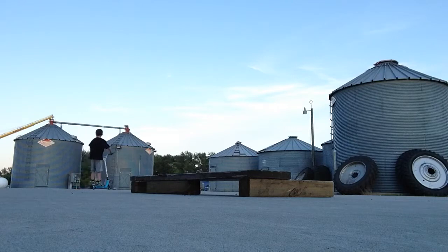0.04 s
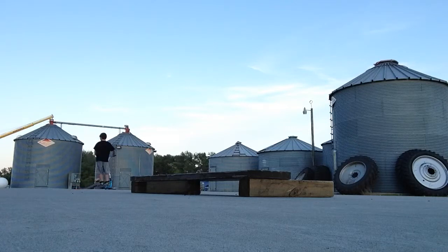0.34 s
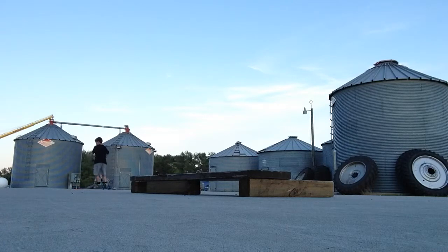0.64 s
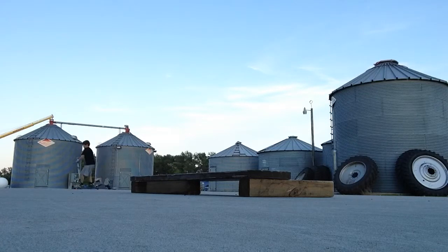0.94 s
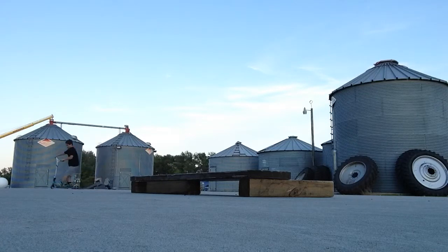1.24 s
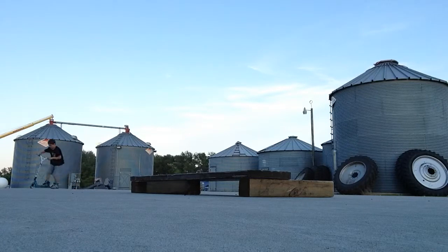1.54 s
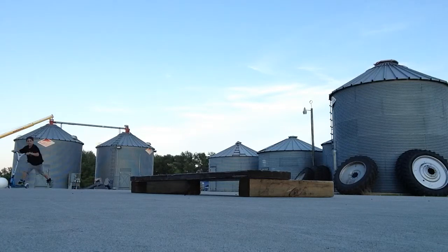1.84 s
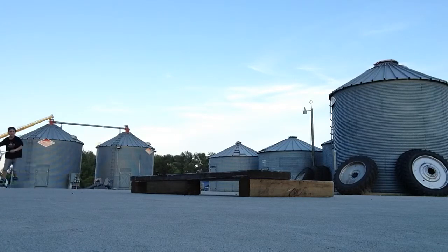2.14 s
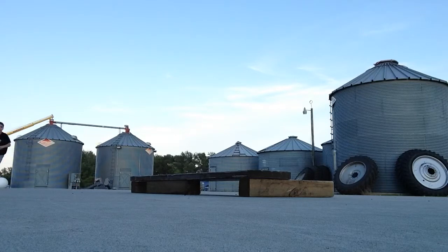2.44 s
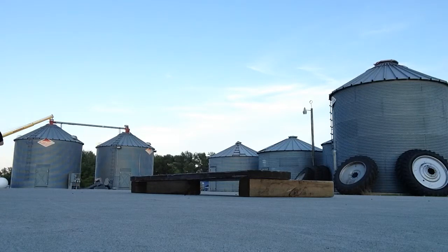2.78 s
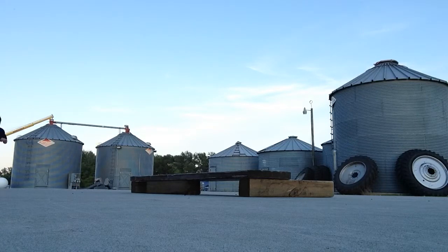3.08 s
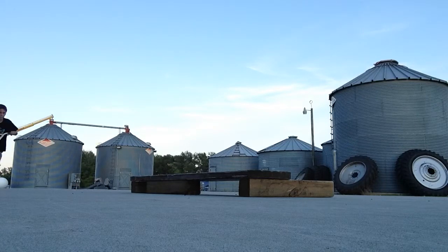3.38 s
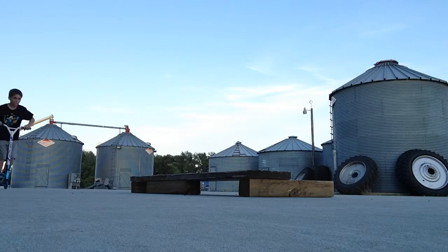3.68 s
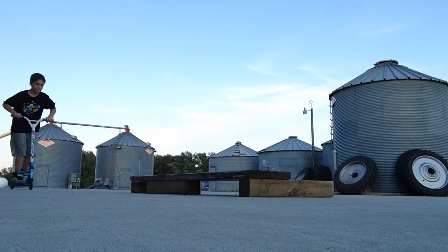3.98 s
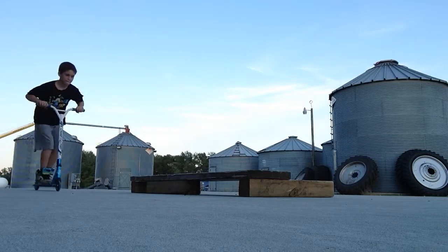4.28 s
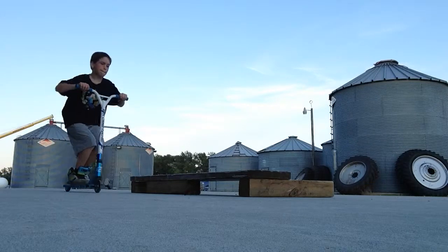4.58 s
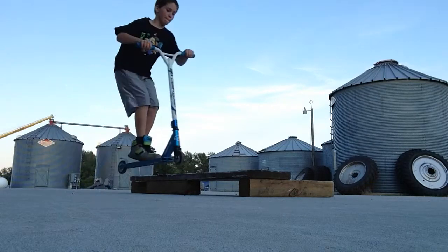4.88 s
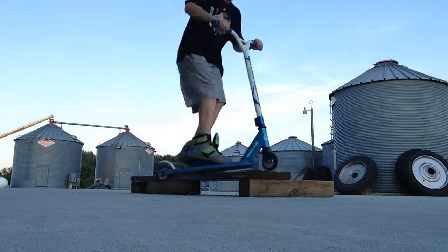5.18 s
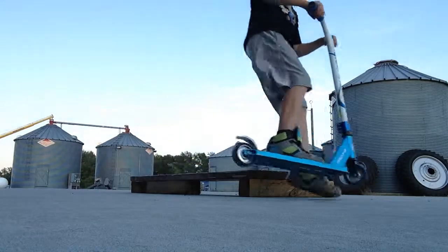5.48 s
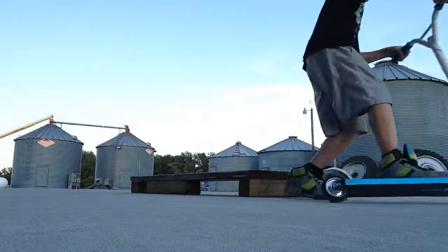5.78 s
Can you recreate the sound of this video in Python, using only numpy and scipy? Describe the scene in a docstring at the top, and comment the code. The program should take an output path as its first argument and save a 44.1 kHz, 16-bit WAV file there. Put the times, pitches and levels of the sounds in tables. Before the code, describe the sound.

For the first four seconds a kick scooter circles some way off on concrete, its hard wheels humming faintly on grit. Light frame clacks and soft shoe scuffs come around 1, 1.7, 2.4 and 3.2 seconds. A small bird gives faint runs of falling chirps near 0.5, 2 and 3.6 seconds over quiet open air. At about 4.5 seconds a gust buffets the ground-level microphone with low thumps as the scooter approaches. At 5.1 seconds it lands loudly and very close on a wooden pallet, with hollow thuds and a metallic crack, then rumbles briefly along the boards. After another wind bump, it drops onto the concrete at about 5.6 seconds with a loud clatter of frame and ringing steel brake, and a gritty scrape. A shoe scuff and lighter clacks follow near 6 seconds. A faint, dull echo comes off nearby steel bins.

```python
"""Kick scooter on a farmyard

The microphone lies on a concrete slab, bumped by wind; a small bird calls. A scooter circles some way
off, hard wheels humming on grit, frame clacking, steel brake ringing, a shoe scuffing the ground. It
rolls up close, thuds onto the boards of a wooden pallet and drops off. Steel grain bins echo faintly."""
import sys
import numpy as np
from scipy import signal
from scipy.fft import rfft, irfft, next_fast_len
from scipy.io import wavfile
from scipy.ndimage import uniform_filter1d

SR = 44100
rng = np.random.default_rng(int(sys.argv[2]) if len(sys.argv) > 2 else 0)


def log_audio(samples):
    """Write samples as a 16-bit WAV file to the path given in sys.argv[1]."""
    # one column per channel
    frames = np.atleast_2d(samples).T
    # limit to full scale, then quantise
    limited = np.clip(frames, -1, 1)
    pcm = np.round(limited * 32767).astype(np.int16)
    wavfile.write(sys.argv[1], SR, pcm)


N = 265746
T = np.arange(N) / SR

# dull spectrum of the frame's rattle and of rubbing: freq_hz, gain_db
FRAME_SPECTRUM = [(60, -22.5), (200, -9.5), (550, -1.5), (800, -2), (1150, -0.5), (1900, -2.5), (2700, -13),
                  (4000, -18), (16000, -66.5)]
# resonances that colour both: centre_hz, width_hz, lift_db
FRAME_RESONANCES = [(535, 34, 7), (720, 24, 9.5), (1180, 90, 0.5), (1508, 29, 6)]


def undb(db):
    return 10 ** (np.asarray(db) / 20)


def unit(x):
    return x / np.sqrt(np.mean(x ** 2))


def fade(t, t60):
    return np.exp(-np.log(1000) * t / t60)


def swell(start_s, length_s, attack_s, t60):
    """Rise, hold until the length is over, then die away."""
    return np.clip((T - start_s) / attack_s, 0, 1) * fade(np.maximum(T - start_s - length_s, 0), t60)


def curves(table):
    """Each column after the first, joined by straight lines in time."""
    times, *columns = np.transpose(table)
    return [np.interp(T, times, column) for column in columns]


def add(out, start_s, x):
    """Mix x in from the start time."""
    i = max(int(start_s * SR), 0)
    out[i:i + len(x)] += x[:max(N - i, 0)]


def colour(x, spectrum, resonances=()):
    """Causal filter of unit power from a spectrum and resonances that stand out of it."""
    size = next_fast_len(N + 8192)
    freq_hz = np.arange(size // 2 + 1) * SR / size + 1
    hz, db = np.transpose(spectrum)
    gain_db = np.interp(np.log(freq_hz), np.log(hz), db)
    for centre_hz, width_hz, lift_db in resonances:
        gain_db += lift_db / (1 + ((freq_hz - centre_hz) / width_hz) ** 2)
    cepstrum = irfft(np.log(unit(undb(gain_db))), size)
    cepstrum[1:size // 2] *= 2  # minimum phase: nothing rings before a blow
    cepstrum[size // 2 + 1:] = 0
    return irfft(rfft(x, size) * np.exp(rfft(cepstrum)), size)[:N]


def walk(rate_hz):
    """Smooth random wander, rms 1."""
    hold = int(SR / rate_hz)
    steps = np.repeat(rng.standard_normal(N // hold + 1), hold)
    return unit(uniform_filter1d(steps, hold)[:N])


def grains(per_s, spread_db):
    """Dense tiny clicks of very unequal size."""
    size = undb(spread_db * np.minimum(rng.exponential(size=N), 4))
    return unit((rng.random(N) < per_s / SR) * size * rng.choice([-1, 1], N))


def ring(modes, detune, favoured_hz=1000, focus_db=0):
    """Struck modes ring down; the contact point favours those near one pitch."""
    t = T[:SR // 2]
    hz, db, t60 = np.transpose(modes)[:, :, None]
    pitch_hz = hz * (1 + detune * rng.standard_normal(hz.shape))
    side = (-1.) ** np.arange(len(modes))[:, None]  # neighbouring modes swing opposite ways
    size = undb(db + focus_db / (1 + (np.log2(hz / favoured_hz) / .24) ** 2))
    size = side * size / np.sqrt(np.sum(size ** 2) / 2)
    return np.sum(size * fade(t, t60) * np.sin(2 * np.pi * pitch_hz * t), axis=0)


def chatter(t60, snap, rattle_db):
    """One sharp contact, then loose parts buzzing unevenly to rest."""
    t = T[:SR // 3]
    contacts = undb(rattle_db * unit(uniform_filter1d(rng.standard_normal(len(t)), size=45)))
    buzz = unit(contacts * rng.standard_normal(len(t))) * fade(t, t60)
    buzz[0] += snap * 2
    return buzz


def yard(level_db=-69.5):
    """Quiet open air that swells a little."""
    air_spectrum = [(18, -24.5), (40, -10), (85, -3.5), (140, 11.5), (200, 0), (260, 2.5), (360, -4.5),
                    (700, -6.5), (900, -13.5), (1400, -16.5), (2300, -26.5), (3800, -23), (7500, -24.5),
                    (15000, -32.5)]  # freq_hz, gain_db
    return colour(rng.standard_normal(N), air_spectrum) * undb(level_db + walk(1.9))


def wind(breeze_db=-69.5, strong_db=-24, breakup=.45, flutter_db=5):
    """Gusts rise out of a breeze and push on the microphone; strong ones break into faster eddies."""
    gusts = [(0, 0.13, -51.5), (0.247, 0.15, -53.5), (.47, 0.11, -54), (2.99, 0.23, -64.5),
             (3.559, 0.12, -60), (4.126, 0.15, -52.5), (4.455, 0.035, -46.5), (4.517, 0.18, -24),
             (4.713, 0.038, -28.5), (5.429, 0.07, -32.5), (5.534, .14, -32)]  # start_s, length_s, level_db
    buffet_spectrum = [(18, -30), (45, -0.5), (85, 4), (160, 2.5), (260, -10), (400, -29), (800, -47),
                       (2000, -76.5), (10000, -115)]  # slow air: freq_hz, gain_db
    eddy_spectrum = [(60, -19), (200, 3.5), (400, -1.5), (600, -8), (900, -26), (1500, -51), (3000, -68),
                     (10000, -105)]  # fine eddies: freq_hz, gain_db
    breeze = undb(breeze_db + 6 * np.tanh(walk(7)))
    gusting = sum(undb(db) * swell(s, length, attack_s=.0093, t60=.14) for s, length, db in gusts)
    gust_db = 20 * np.log10(breeze + gusting)
    air = colour(rng.standard_normal(N), buffet_spectrum)
    air /= np.sqrt(uniform_filter1d(air ** 2, size=1300) + 1e-3)  # the gust alone sets the strength
    eddy_db = gust_db - 4 + breakup * (gust_db - strong_db) + flutter_db * np.tanh(walk(110))
    eddies = colour(rng.standard_normal(N), eddy_spectrum) * undb(eddy_db)
    return air * undb(gust_db) + eddies + wind_thumps(gust_db, breeze_db, strong_db)


def wind_thumps(gust_db, breeze_db, strong_db, per_s=24, above_db=7, scatter_db=8, scatter_octaves=.77):
    """Single eddies hit the microphone for a cycle or two, louder and higher in a stronger gust."""
    hardest = [(4.183, -25, 111), (4.239, -28, 192), (4.533, -8, 238), (4.581, -14, 154),
               (4.622, -13.5, 440), (4.653, -11, 274), (4.69, -11, 129), (4.696, -13, 560),
               (5.447, -18.5, 195), (5.485, -24.5, 290), (5.507, -17.5, 220), (5.581, -16.5, 281)]  # peak_s, peak_db, pitch_hz
    out, eddies = np.zeros(N), list(hardest)
    chance = rng.uniform(-1, 1, (512, 3))
    phases = rng.uniform(0, 2 * np.pi, 512)
    for slot_s, (late, force, shift) in zip(np.arange(0, T[-1], 1 / per_s), chance):
        s = slot_s + late / per_s / 2
        db = np.interp(s, T, gust_db)
        hz = np.interp(db, [breeze_db, strong_db], [125, 284])
        eddies.append((s, db + above_db + scatter_db * force, hz * 2 ** (scatter_octaves * shift)))
    for (s, db, hz), phase in zip(eddies, phases):
        span = slice(*np.searchsorted(T, [s - .04, s + .04]))
        turn = 2 * np.pi * hz * (T[span] - s)
        out[span] += undb(db) * np.cos(turn + phase) / np.cosh(turn / 2.2)
    return out


def wheels():
    """Rough ground shakes wheels and deck, harder on the boards; the wheels sing and grit crackles."""
    slab_roll = [(0, -66, -74), (.8, -62.5, -74.5), (1.15, -62.5, -64.5), (1.55, -66.5, -70),
                 (2.1, -63.5, -70), (2.8, -65, -72), (3.3, -62, -71.5), (4.4, -62, -72), (4.72, -51, -65),
                 (4.9, -61, -71), (5.9, -70.5, -72), (6.03, -57, -58.5)]  # follows speed and distance: time_s, hum_db, grit_db
    board_runs = [(5.154, 0.098, -44.5, -54.5), (5.247, 0.039, -39.5, -42), (5.301, 0.02, -36.5, -43)]  # along the pallet: start_s, length_s, hum_db, grit_db
    hum_spectrum = [(60, -35.5), (160, -3), (400, -2), (590, -3.5), (800, 0.5), (1500, -9.5), (2500, -23),
                    (5000, -28), (16000, -64.5)]  # freq_hz, gain_db
    grit_spectrum = [(400, -24), (1500, 6.5), (3300, -0.5), (5000, -4.5), (7500, -10.5), (10000, -16),
                     (16000, -20)]  # freq_hz, gain_db
    rolling_resonances = [(276, 72, 6), (495.5, 89, 11), (696, 31, 6.5), (1124, 11, 12), (1390, 78, 11),
                          (1970, 62, 3)]  # centre_hz, width_hz, lift_db
    singing_pitch = [(2.1, 520), (2.45, 498), (4.15, 491), (4.42, 474), (6.03, 472)]  # sinks as the scooter slows: time_s, pitch_hz
    singing_spells = [(1.856, .35, -63.5), (3.419, 0.74, -66.5), (4.342, 0.3, -57.5), (5.24, .13, -44)]  # start_s, length_s, level_db
    shake, grit = undb(curves(slab_roll))
    for s, length, hum_db, grit_db in board_runs:
        run = swell(s, length, attack_s=.005, t60=.09)
        shake += undb(hum_db) * run
        grit += undb(grit_db) * run
    bumps = walk(45)
    hum = colour(grains(2200, 2.8) * shake * undb(2.6 * bumps - 2), hum_spectrum, rolling_resonances)
    note_hz = curves(singing_pitch)[0] * (1 + .0176 * walk(60))
    singing = sum(undb(db) * swell(s, length, attack_s=.042, t60=.33) for s, length, db in singing_spells)
    note = np.sin(2 * np.pi * np.cumsum(note_hz) / SR) * singing * undb(2.1 * walk(28))
    crackle = colour(grains(5000, 3) * grit * undb(2.4 * bumps), grit_spectrum)
    return hum + note + crackle


def bird(note_s=.054, spacing_s=.128, rise_db=1, drop_hz=148.5, rasp=.043, scatter_db=5):
    """Short, slightly raspy notes slide down, each with its own bend and strength."""
    phrases = [(0.466, .44, -70), (2.056, .57, -68.5), (3.594, .44, -68), (5.414, .19, -70)]  # runs of evenly spaced notes: start_s, length_s, first_note_db
    high_whistles = [(5.55, 6810, 5200, -64.5), (5.808, 8170, 4630, -69.5)]  # start_s, start_hz, end_hz, level_db
    notes = list(high_whistles)
    for first_s, length, db in phrases:
        for k, s in enumerate(np.arange(first_s, first_s + length, spacing_s)):
            notes.append((s, 4350, 3150 - k * drop_hz, db + k * rise_db))
    out = np.zeros(N)
    progress = np.linspace(0, 1, int(note_s * SR))
    envelope = np.sin(np.pi * progress ** .58)
    wobble = 1 + rasp * walk(900)
    chance = rng.uniform([.8, -1], [1.1, 1], (len(notes), 2))
    for (s, start_hz, end_hz, db), (bend, force) in zip(notes, chance):
        glide_hz = start_hz * (end_hz / start_hz) ** (progress ** bend)
        pitch_hz = glide_hz * np.roll(wobble, -int(s * SR))[:len(progress)]
        note = undb(db + scatter_db * force) * envelope * np.sin(2 * np.pi * np.cumsum(pitch_hz) / SR)
        add(out, s, note)
        add(out, s + .052, undb(-9.5) * note)  # the nearest bin throws the note back
    return out


def scuffs():
    """Soles and skidding wheels drag over sandy concrete: a quick bite and a slower release."""
    drags = [(0.836, 0.11, -84, -64.5), (1.568, 0.039, -62.5, -70), (1.685, 0.055, -56, -57.5),
             (1.761, 0.078, -57.5, -63.5), (1.869, 0.097, -63, -67.5), (2.343, 0.024, -54.5, -60),
             (3.102, 0.069, -54, -56), (3.19, 0.057, -62.5, -64.5), (4.304, 0.077, -59.5, -64),
             (4.401, 0.053, -58, -65.5), (5.681, 0.046, -33, -34.5), (5.704, 0.035, -29.5, -30.5),
             (5.736, 0.037, -39.5, -41.5), (5.93, 0.027, -33, -42.5), (5.953, 0.069, -44.5, -51.5)]  # start_s, length_s, rub_db, sand_db
    sand_spectrum = [(800, -11.5), (2200, -10), (3500, 4.5), (5500, -5), (8000, -16.5), (11000, -17),
                     (16000, -23)]  # freq_hz, gain_db
    rub, sand = np.zeros((2, N))
    for s, length, rub_db, sand_db in drags:
        pressure = np.interp(T, s + length * np.array([0, .15, .6, 1.1]), [0, .93, .78, .0035])
        rub += undb(rub_db) * pressure
        sand += undb(sand_db) * pressure
    slips = undb(1.7 * walk(220) - .5)
    rubbing = colour(rub * slips * grains(2500, 3.1), FRAME_SPECTRUM, FRAME_RESONANCES)
    return rubbing + colour(sand * slips * grains(4000, 2.2), sand_spectrum)


def frame(light_focus_db=21, hard_focus_db=12, calm_db=5):
    """A blow rattles and rings deck and stem, metal cracks on metal, and the brake rings."""
    clacks = [(.899, -38.5, 780, -56.5, -62, 0.055), (1.056, -46, 1750, -57.5, -78, 0.033),
              (1.162, -42.5, 1350, -58, -68, 0.055), (1.712, -48.5, 1330, -70, -75, 0.096),
              (1.757, -50, 1040, -57.5, -78, .08), (2.352, -49.5, 1010, -68, -78, 0.084),
              (2.375, -58, 1400, -53, -60, 0.05), (3.114, -53, 1950, -47.5, -61, 0.053),
              (3.175, -45, 1160, -61.5, -80, 0.12), (3.253, -49, 1150, -68, -86, .066),
              (3.304, -49, 695, -64, -85, 0.16), (3.39, -48, 503, -68, -83, 0.1),
              (3.407, -49, 1550, -62, -84, .075), (4.216, -53.5, 1830, -63.5, -83, 0.16),
              (4.353, -40.5, 1066, -70, -79.5, 0.056), (4.751, -54, 1600, -46.5, -62, 0.039),
              (5.093, -11, 1330, -30, -57, .023), (5.104, -23, 1400, -35, -45, 0.092),
              (5.1192, -14.5, 1500, -18.5, -20, 0.032), (5.144, -45, 1215, -37, -36, 0.076),
              (5.607, -18, 1023, -31.5, -36.5, .025), (5.615, -29, 700, -52, -65.5, 0.089),
              (5.640, -11.5, 1420, -22, -39, 0.048), (5.648, -16, 1520, -17.5, -14, 0.062),
              (5.661, -20, 1073, -28.5, -37, 0.084), (5.68, -10.5, 948, -12, -18, 0.045),
              (5.688, -15.5, 554, -20, -13.5, 0.063), (5.722, -21.5, 1100, -27.5, -41, .071),
              (5.74, -35, 1193, -35.5, -41, 0.086), (5.932, -34.5, 700, -41, -70, 0.061),
              (5.948, -29.5, 1090, -28, -49.5, 0.059), (5.976, -35.5, 805, -38, -68, 0.045)]  # start_s, body_db, favoured_hz, crack_db, brake_db, t60_s
    deck_modes = [(267, -14.5, 0.081), (440, 5, 0.085), (546, 0.5, 0.095), (650, -4.5, 0.061),
                  (918, -13, 0.043), (1003, 5, 0.071), (1143, 0, 0.093), (1208, -6.5, 0.22),
                  (1391, -4.5, 0.11), (1490, -3, 0.044), (1597, -13.5, 0.078), (1830, -13, 0.067),
                  (2182, -3.5, 0.039), (2200, -16, 0.069)]  # deck and stem: pitch_hz, level_db, t60_s
    brake_modes = [(6020, -10.5, 0.045), (6400, -9, 0.093), (7300, -13.5, 0.081), (7180, -2, 0.066),
                   (7870, 2.5, 0.031), (7930, -14, 0.11), (8680, -11.5, 0.07), (8700, -11.5, 0.047),
                   (9130, -15.5, .06)]  # steel brake over the rear wheel: pitch_hz, level_db, t60_s
    crack_spectrum = [(700, -22), (2400, 3), (3200, 6), (4300, -2.5), (6100, 3), (8300, -4), (9600, -5),
                      (12000, -8.5), (16000, -12)]  # freq_hz, gain_db
    tube_resonances = [(2470, 330, -6), (3080, 130, 3), (3320, 61, 1), (4400, 23, -1.5), (4570, 260, 9),
                       (4944, 83, 7), (6270, 160, 3.5), (9700, 150, 5.5), (13600, 400, 0)]  # hollow stem and bars: centre_hz, width_hz, lift_db
    body, crack, rings = np.zeros((3, N))
    for s, body_db, hz, crack_db, brake_db, t60 in clacks + loose_knocks():
        # a light knock sounds mostly one hollow note; a hard one shakes every part loose
        light = np.interp(body_db, [-42, -28], [1, 0])
        focus_db = hard_focus_db + light * (light_focus_db - hard_focus_db)
        add(body, s, undb(body_db - 3 - calm_db * light) * chatter(t60, snap=3.8, rattle_db=-.5))
        add(crack, s, undb(crack_db) * chatter(t60, snap=2.7, rattle_db=1.5))
        deck = ring(deck_modes, detune=.0061, favoured_hz=hz, focus_db=focus_db)
        foot_damping = fade(T[:len(deck)], 2.8 * t60)
        add(rings, s, undb(body_db - 2.5) * deck * foot_damping)
        add(rings, s, undb(brake_db) * ring(brake_modes, detune=.0024))
    rattle = colour(body, FRAME_SPECTRUM, FRAME_RESONANCES)
    return rattle + colour(crack, crack_spectrum, tube_resonances) + rings


def loose_knocks(per_s=2.3, from_s=.9, to_s=5.7, scatter_db=4, scatter_octaves=.55):
    """Loose parts knock faintly at chance moments; rows have the columns of the frame's clacks."""
    body_db, crack_db, brake_db, centre_hz, t60 = -63, -73.5, -84, 1300, .068
    chance = rng.uniform(-1, 1, (64, 3))
    knocks = []
    for slot_s, (late, force, spot) in zip(np.arange(from_s, to_s, 1 / per_s), chance):
        s = slot_s + late / per_s / 2
        hz = centre_hz * 2 ** (scatter_octaves * spot)
        knocks.append((s, body_db + scatter_db * force, hz, crack_db + scatter_db * force, brake_db, t60))
    return knocks


def pallet():
    """Close by, each wheel knocks on the boards and leaves them ringing."""
    thuds = [(5.094, -10.5, -11.5, 640), (5.1035, -9.5, -16.5, 406), (5.1374, -9, -13.5, 750),
             (5.1495, -21.5, -21.5, 519), (5.281, -36.5, -31, 450), (5.312, -26, -32.5, 496),
             (5.335, -31.5, -41.5, 775), (5.389, -39.5, -45, 440)]  # start_s, ring_db, knock_db, favoured_hz
    board_modes = [(146, -14, .1), (241.3, -9, 0.28), (317, -4.5, 0.13), (427, 1.5, 0.16),
                   (434.6, -14, 0.31), (447, -10.5, 0.21), (520, -8, 0.092), (720.7, -0.5, 0.1),
                   (763, -1, 0.075), (821, -6.5, 0.1), (957, -18, 0.19), (1116, -10, .09),
                   (1205, -10.5, 0.23), (1444, -22.5, 0.0806), (1480, -27.5, .1), (1860, -22, .07),
                   (2020, -10.5, 0.074), (2256, -36.5, .1)]  # pitch_hz, level_db, t60_s
    wood_spectrum = [(60, -44.5), (200, 4), (700, 3), (1300, -3), (2200, -11.5), (3200, -29.5), (6000, -30),
                     (16000, -55.5)]  # the dry knock: freq_hz, gain_db
    boards, knocks = np.zeros((2, N))
    for s, ring_db, knock_db, hz in thuds:
        add(boards, s, undb(ring_db) * ring(board_modes, detune=.001, favoured_hz=hz, focus_db=14))
        add(knocks, s, undb(knock_db) * chatter(t60=.065, snap=2.7, rattle_db=2))
    return boards + colour(knocks, wood_spectrum)


def echo(x, t60, level_db, build_s=.034):
    """Sound scatters back from the bins and trees, late and dull."""
    # freq_hz, gain_db
    tail_spectrum = [(80, -9.5), (450, 2), (1500, -15), (5000, -7), (9000, -30), (16000, -35)]
    tail = rng.standard_normal(N) * fade(T, t60) * np.clip(T / build_s, 0, 1)
    tail = colour(tail, tail_spectrum)
    return undb(level_db) * signal.fftconvolve(x, tail / np.sqrt(np.sum(tail ** 2)))[:N]


def distance(x, approach_s=4.6, closest_s=5.65, dull_hz=7500):
    """Far from the microphone the scooter loses its top treble and more comes back off the bins."""
    nearness = np.interp(T, [approach_s, closest_s], [.23, .93])
    dull = signal.filtfilt(*signal.butter(3, dull_hz, fs=SR), x)
    direct = nearness * x + (1 - nearness) * dull
    return direct + echo(direct * undb(-24 * nearness), t60=.44, level_db=-18)


def scene():
    """Scooter, bird, wind and open air, heard in mono from the slab."""
    scooter = distance(wheels() + pallet() + frame() + scuffs())
    song = bird()
    return (scooter + song + echo(song, t60=.22, level_db=-8) + wind() + yard())[None]


def record(dry, ceiling=.84, top_hz=15700):
    """The microphone rounds the loudest peaks and cuts the top."""
    rounded = ceiling * np.tanh(dry / ceiling)
    return signal.sosfilt(signal.ellip(8, .2, 70, top_hz, fs=SR, output="sos"), rounded)


dry = scene()
out = record(dry)
log_audio(out)
```